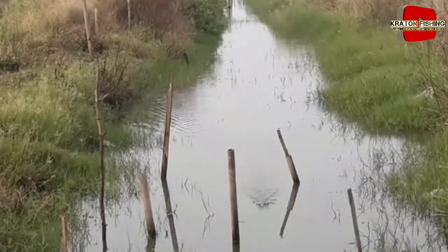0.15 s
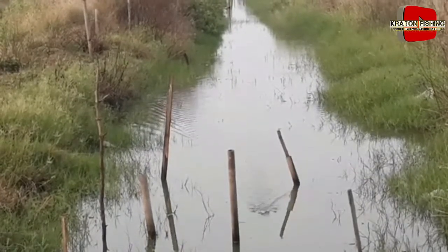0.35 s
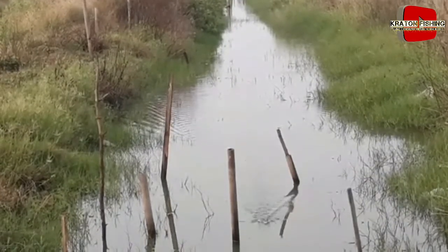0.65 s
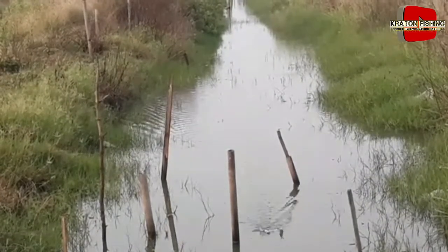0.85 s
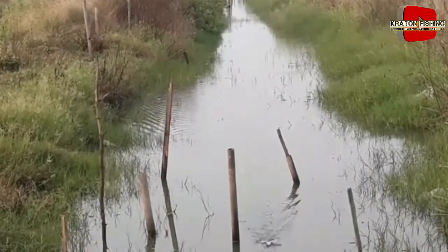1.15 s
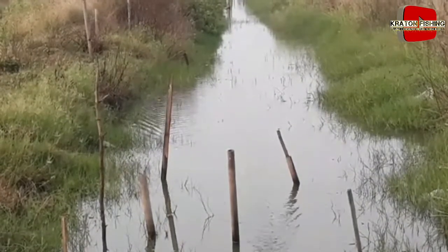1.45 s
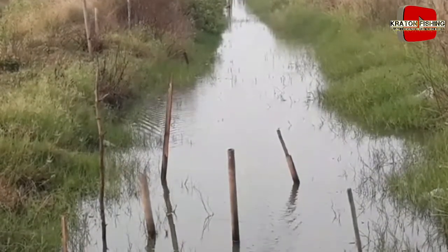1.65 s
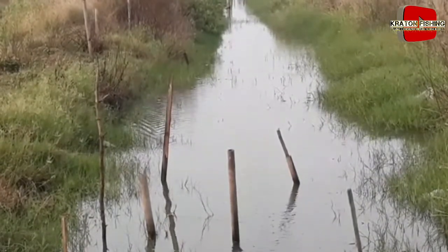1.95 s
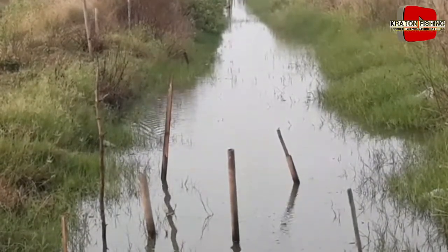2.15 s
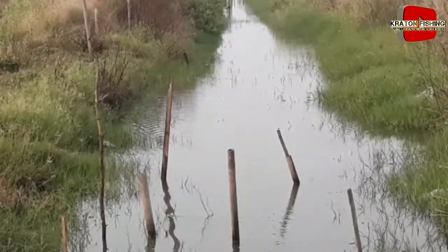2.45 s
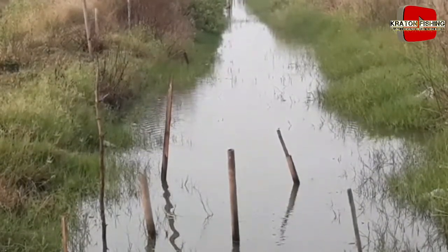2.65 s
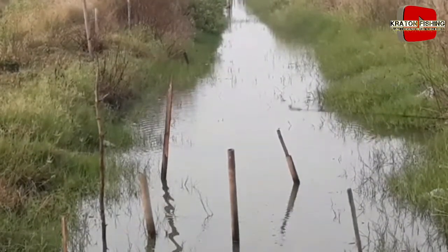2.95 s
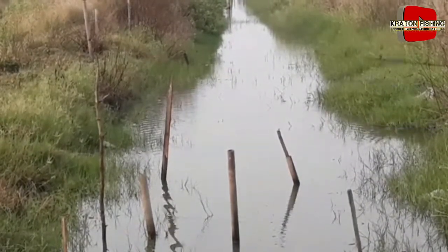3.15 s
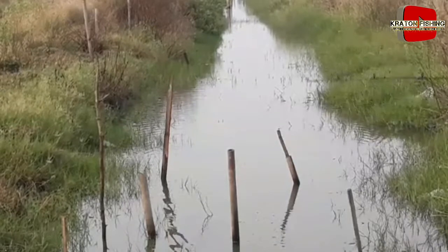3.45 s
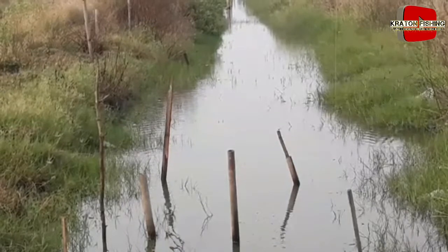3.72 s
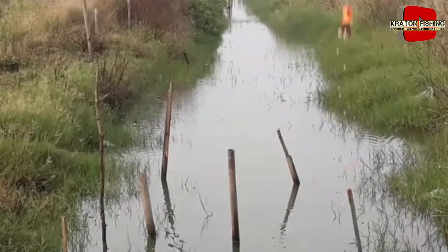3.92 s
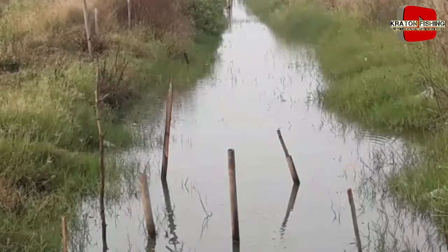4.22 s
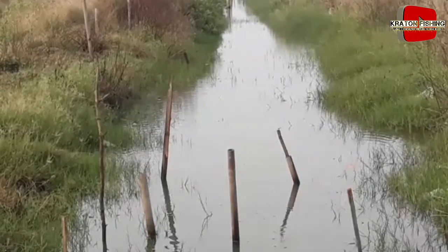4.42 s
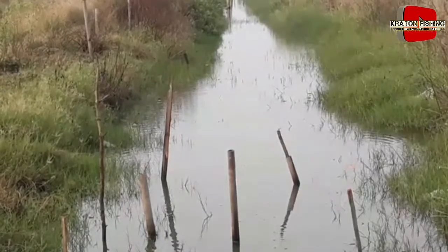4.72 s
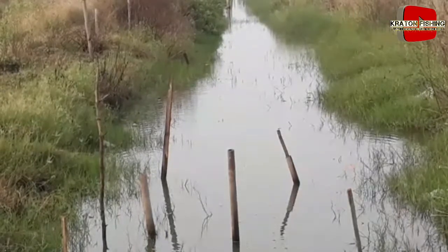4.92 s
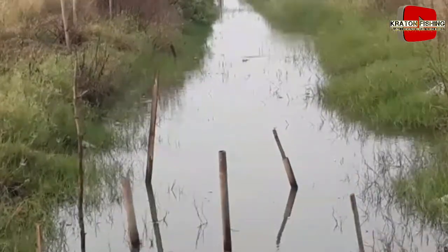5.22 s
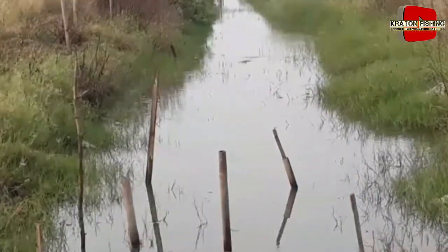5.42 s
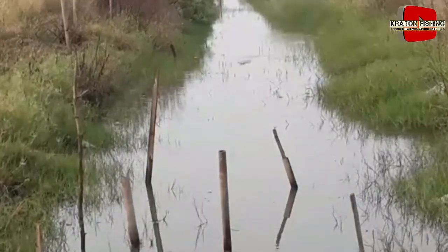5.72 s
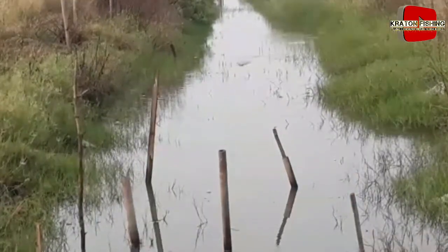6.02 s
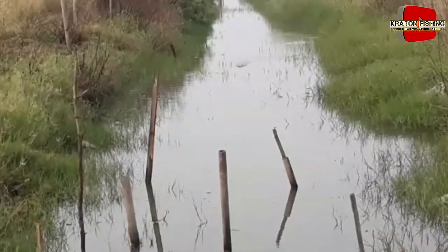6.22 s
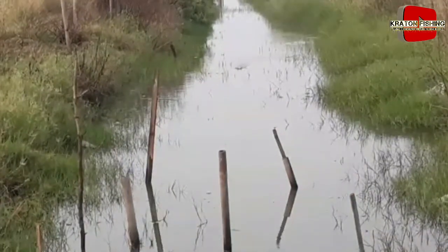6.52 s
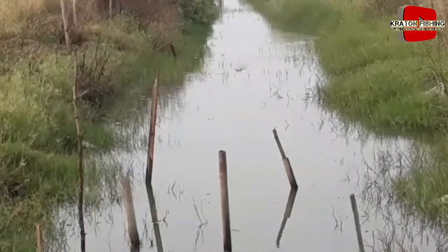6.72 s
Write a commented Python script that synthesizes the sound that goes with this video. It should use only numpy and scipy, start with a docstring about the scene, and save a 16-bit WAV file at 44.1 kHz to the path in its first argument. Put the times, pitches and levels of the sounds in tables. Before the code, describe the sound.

Close, loud, hollow plops of a lure on narrow canal water come singly and in quick pairs, mostly in the first five seconds, the loudest slightly overloading the microphone. Each leaves a brief fizz of droplets and a dull slap-back echo. A steady high insect drone, a low breeze, faint bird whistles and nasal calls, and tiny tackle clicks fill the open countryside.

```python
"""Hollow plops and slaps on water, close by, as an angler works a lure in a narrow canal.
Each plop is a shaped pulse with a ringing air pocket and a fizz of spray. It comes back off a hard face
some 13 m away and, faintly, from the far trees; the loudest overload the microphone.
Shaped noise makes the insects high in the grass and the light breeze, with low pulses for its buffets.
A few birds call in gliding tones, and tackle ticks in short bursts of ringing noise."""
import sys
import numpy as np
from scipy import signal
from scipy.fft import rfft, irfft
from scipy.io import wavfile
from scipy.ndimage import uniform_filter1d

SR = 44100
rng = np.random.default_rng(int(sys.argv[2]) if len(sys.argv) > 2 else 0)


def transcribe(u):
    """Save the signal u as a 16-bit wav file named by the first command-line argument.

    u: samples, shape (n,) or (channels, n), limited to [-1, 1]; the rate is SR.
    q: integer samples, one column per channel.
    """
    v = np.clip(np.atleast_2d(u).T, -1, 1)
    q = np.round(v * 32767).astype(np.int16)
    wavfile.write(sys.argv[1], SR, q)


N = 302967
TIME = np.arange(N) / SR

# every plop on the water: [t/s, relative strength/dB, bass change from heaved water/dB,
# treble change from the crack/dB, air pocket f/Hz, change of the far face's echo/dB]
PLOP_EVENTS = [(0.2139, -5.5, -5.5, -4.5, 700, 0), (0.5063, -8, 5.5, 2, 770, -2),
               (0.5098, -17.5, 2.5, 9.5, 1020, -3), (0.5199, -5, -8, -10, 720, -6.5),
               (1.2552, -13, -0.5, -5.5, 1000, 2.5), (1.4861, -11.5, -0.5, -3.5, 890, -0.5),
               (2.5105, -14, 0, -1.5, 620, 4.5), (2.5384, -13, 2, -4, 600, 4),
               (3.0755, -8, 6.5, -5, 1010, 4.5), (3.3756, -5, 6.5, 0.5, 566, -0.5),
               (4.1982, -6.5, -9.5, -8, 646, 2.5), (4.206, -13.5, 2, -3, 800, -14),
               (4.2780, -4, -10.5, -0.5, 804, 2), (4.7993, -6, -7, 1.3, 710, 1)]


def amp(db):
    """Turns decibels into a gain."""
    return 10 ** (np.asarray(db) / 20)


def evened(x):
    """Scales a sound to an average (rms) level of 1."""
    return x / np.sqrt(np.mean(x ** 2) + 1e-20)


def read(points, hz):
    """Joins (f/Hz, value) points with straight lines on a log-frequency axis."""
    f, value = np.transpose(points)
    return np.interp(np.log(hz + 1), np.log(f + 1), value)


def add(mix, s, sound):
    """Lays a sound into the mix at time s, in seconds."""
    part = mix[max(round(s * SR), 0):][:len(sound)]
    part += sound[:len(part)]


def causal(db, size=4096):
    """Makes the sharpest-starting (minimum-phase) pulse that has this spectrum."""
    log_gain = np.log(amp(np.maximum(db, -100)))
    circle = np.concatenate([log_gain, log_gain[-2:0:-1]])
    spectrum = np.exp(np.conj(signal.hilbert(circle)))
    return np.fft.ifft(spectrum).real[:size]


def noise(field, count, size):
    """Makes noise whose relative level in dB over time and frequency is field(t, hz)."""
    hop = size // 4
    t = np.arange(count // hop + 6)[:, None] * hop / SR
    hz = np.fft.rfftfreq(size, 1 / SR)
    shape = (len(t), len(hz))
    z = rng.standard_normal(shape) + 1j * rng.standard_normal(shape)
    shaped = (z * amp(field(t, hz))).T
    return signal.istft(shaped, nperseg=size, noverlap=size - hop)[1][:count]


def patches(t, hz, size):
    """Draws random ups and downs, smoothed over time and frequency, rms 1."""
    chance = rng.standard_normal((len(t), len(hz)))
    smooth_in_time = uniform_filter1d(chance, size, 0)
    return evened(uniform_filter1d(smooth_in_time, size, 1))


def lulls():
    """Gives the level change in dB over time of the insects and of the wash."""
    # one long lull of the insects alone, then a brief dip of both:
    # [middle t/s, time from middle to 1/e of the depth/s, insects level/dB, wash level/dB]
    lull_table = [(4.55, 0.99, -2, 0), (5.208, 0.1, -4, -7.5)]
    return sum(np.outer(depths_db, np.exp(-((TIME - s) / half) ** 2))
               for s, half, *depths_db in lull_table)


def air(lumps_db=2, patchy_db=1, rumble_hz=300):
    """A smooth distant wash over the lumpy rumble of the breeze, which slowly dies down."""
    # colour of breeze and wash: [f/Hz, relative level per Hz/dB]
    air_colour = [(18, -55), (35, -33), (55, -9), (90, -0.5), (160, -4.5), (320, -9), (400, -13.5),
                  (650, -16), (1200, -19.5), (3000, -31), (4500, -29.5), (5200, -38), (6500, -32.5),
                  (9000, -58)]
    level_db, settle_db_per_s = -38.5, 0.44

    def field(t, hz):
        """The colour, with unevenness that is strongest in the bass."""
        uneven_db = patchy_db + lumps_db / (1 + (hz / rumble_hz) ** 2)
        return read(air_colour, hz) + uneven_db * patches(t, hz, size=5)
    _, lull_db = lulls()
    return amp(level_db - settle_db_per_s * TIME + lull_db) * evened(noise(field, N, size=2048))


def insects(flutter_db=1.0, level_db=-41.5):
    """Many insects merge into a fluttering drone, strongest in one narrow band."""
    # colour of the chorus: [f/Hz, relative level per Hz/dB]
    chorus_colour = [(4000, -16.5), (6000, -22), (6700, -27), (6950, -12), (7200, 0), (7450, 2.5),
                     (7850, -3), (8020, -47), (8200, -22), (9400, -19.5), (10400, -41), (14000, -36),
                     (15300, -28.5), (16000, -43)]

    def field(t, hz):
        """The colour with random flutter."""
        return read(chorus_colour, hz) + flutter_db * patches(t, hz, size=5)
    lull_db, _ = lulls()
    return amp(level_db + lull_db) * evened(noise(field, N, size=512))


def scatter(count, late_t60=1.13, rise=0.00076):
    """Dense reflections, energy set band by band: a quick decay off the banks, a slow one off the land."""
    # scatter from banks and reeds: [f/Hz, early level/dB, early time to fall 60 dB/s, late level/dB]
    scatter_bands = [(89, 3, 0.067, -6), (297, -16, 0.18, -5), (800, -5, 0.17, -9.5),
                     (2160, -4.5, 0.44, -15)]
    t, hz = np.arange(count) / SR, np.fft.rfftfreq(count, 1 / SR)
    white = rfft(rng.standard_normal(count))
    centres = np.transpose(scatter_bands)[0]
    out = np.zeros(count)
    # each share row fades one band into its neighbours
    for share, (_, early_db, t60, late_db) in zip(np.eye(len(scatter_bands)), scatter_bands):
        band = irfft(white * read(np.c_[centres, share], hz), count)
        early, late = (evened(np.exp(-np.log(1000) * t / d) * (1 - np.exp(-t / rise)))
                       for d in (t60, late_t60))
        out += band * np.hypot(amp(early_db) * early, amp(late_db) * late)
    return out / np.sqrt(count)


def glide(length, first_hz, last_hz, waver):
    """Phase of a slightly unsteady bird note, and its soft-edged envelope."""
    count = round(length * SR)
    unsteady = 1 + waver * evened(uniform_filter1d(rng.standard_normal(count), size=200))
    pitch_hz = np.linspace(first_hz, last_hz, count) * unsteady
    return 2 * np.pi * np.cumsum(pitch_hz) / SR, signal.windows.tukey(count, .5)


def birds(wet_db=-12, sag_hz_per_s=3000):
    """Pure falling whistles and nasal calls rich in harmonics, some way off."""
    # whistles: [t/s, length/s, first f/Hz, level/dB]
    whistles = [(.15, .065, 2200, -44), (1.776, .025, 2290, -41), (2.01, 0.014, 4200, -42),
                (5.422, 0.13, 4770, -44), (6.099, 0.18, 4850, -40.5)]
    # nasal calls: [t/s, length/s, first f/Hz, last f/Hz, level/dB, brightness per harmonic/dB]
    squawks = [(0.124, .048, 810, 770, -48, -1), (1.778, 0.076, 620, 663, -42, .5),
               (1.912, .09, 632, 660, -49.5, -9), (6.692, 0.14, 753, 722, -53, -1)]
    # colour given by the beak: [f/Hz, relative level/dB]
    beak_colour = [(700, -26), (1300, -8), (1950, 5.5), (2600, 0), (3300, -1), (4500, -7.5), (6000, -13),
                   (9000, -31)]
    out = np.zeros(N)
    for s, length, first_hz, db in whistles:
        phase, envelope = glide(length, first_hz, first_hz - sag_hz_per_s * length, waver=0.01)
        add(out, s, amp(db) * envelope * np.sin(phase))
    for s, length, first_hz, last_hz, db, bright_db in squawks:
        phase, envelope = glide(length, first_hz, last_hz, waver=0.017)
        voice = sum(amp(read(beak_colour, k * first_hz) + k * bright_db) * np.cos(k * phase)
                    for k in range(1, 12))
        add(out, s, amp(db) * envelope * evened(voice))
    return out + amp(wet_db) * signal.fftconvolve(out, scatter(count=32768))[:N]


def taps(rows, count, jitter):
    """Single reflections; their delays differ a little (jitter, in s) from one plop to the next."""
    out = np.zeros(count)
    for delay, db in rows:
        shifted = delay + jitter * rng.standard_normal()
        out[abs(round(shifted * SR))] += amp(db)
    return out


def cluster(count, delay, spread):
    """A blurred echo of energy 1, centred on delay; both times in s."""
    t = np.arange(count) / SR
    blur = np.exp(-((t - delay) / spread) ** 2)
    return evened(rng.standard_normal(count) * blur) / np.sqrt(count)


def canal(echo_db, count=32768, dull_hz=1500, blur_db=-15, trees_db=-22, rough_db=0):
    """The paths from one plop to the microphone; the far echoes have lost their treble."""
    # single reflections off the near banks: [delay t/s, level/dB]
    near_rows = [(.00305, -9.5), (.0062, -15), (.018, -20)]
    # single reflections off the hard face: [delay t/s, relative level/dB]
    face_rows = [(.0525, -16), (.066, -23.5), (.0733, -5.5), (.0853, -13)]
    face = taps(face_rows, count, jitter=0.00014)
    # the face is uneven, so part of each reflection arrives smeared over a few milliseconds
    smeared = signal.fftconvolve(face, cluster(count=512, delay=0.0017, spread=0.0032))[:count]
    face = (face + amp(rough_db) * smeared) / np.hypot(1, amp(rough_db))
    far = amp(echo_db) * (face + amp(blur_db) * cluster(count, delay=0.092, spread=0.024))
    far += amp(trees_db) * cluster(count, delay=0.31, spread=0.028)
    dull_far = signal.sosfilt(signal.butter(2, dull_hz, fs=SR, output="sos"), far)
    paths = taps(near_rows, count, jitter=.00005) + scatter(count) + dull_far
    paths[0] += 1  # the direct sound
    return paths


def plops(gain_db=25, heave_hz=420, crack_hz=1500, pocket_width_hz=230, pocket_db=1.5):
    """A slap pushes the water (bass), cracks its surface (treble) and traps air that rings briefly."""
    # colour shared by all plops: [f/Hz, relative level/dB]
    plop_colour = [(35, -16), (82, 9), (180, 0), (295, 8.5), (440, 3.5), (540, 13), (650, 12), (800, 9.5),
                   (1020, 9), (1330, 1), (1520, -9.5), (2600, -10.5), (5000, -30), (10000, -57)]
    out, hz = np.zeros(N), np.fft.rfftfreq(8192, 1 / SR)
    low = 1 / (1 + (hz / heave_hz) ** 6)
    high = 1 - 1 / (1 + (hz / crack_hz) ** 6)
    for s, db, heave_db, crack_db, pocket_hz, echo_db in PLOP_EVENTS:
        pocket = 1 / (1 + ((hz - pocket_hz) / pocket_width_hz) ** 2)
        colour_db = read(plop_colour, hz) + heave_db * low + crack_db * high + pocket_db * pocket
        pulse = causal(colour_db)
        add(out, s, amp(db + gain_db) * signal.fftconvolve(pulse, canal(echo_db)))
    return out


def spray(t60=0.66, rise=0.002, grain_db=4):
    """Fine droplets fizz after each plop and thin out; harder, heavier plops throw more of them."""
    # colour of the droplets: [f/Hz, relative level per Hz/dB]
    spray_colour = [(500, -14), (1500, 3), (2700, -4), (4200, -10), (5600, -25), (10000, -53)]
    base_db, db_per_strength_db, db_per_heave_db = -30, .5, 0.33
    out, t = np.zeros(N), np.arange(16384) / SR
    colour = causal(read(spray_colour, np.fft.rfftfreq(8192, 1 / SR)))
    envelope = (1 - np.exp(-t / rise)) * np.exp(-np.log(1000) * t / t60)
    for s, db, heave_db, *_ in PLOP_EVENTS:
        spray_db = base_db + db_per_strength_db * db + db_per_heave_db * heave_db
        # random boosts, at most five times grain_db, make the noise grainy
        grain = amp(grain_db * np.minimum(rng.exponential(1, len(t)), 5))
        drops = rng.standard_normal(len(t)) * grain
        fizz = evened(signal.fftconvolve(drops, colour)[:len(t)])
        add(out, s, amp(spray_db) * envelope * fizz)
    return out


def ticks(width_hz=2500):
    """Tiny knocks and scrapes of tackle, each a burst of noise in one broad resonance."""
    # the clearest ones: [t/s, approximate peak level/dB, f/Hz, decay to 1/e/s]
    clear_ticks = [(0.666, -34, 4900, .004), (2.127, -40, 6000, .002), (3.525, -43, 9000, .003),
                   (3.703, -25, 6700, 0.0035), (5.337, -48, 5500, .015), (5.729, -42, 5500, 0.014)]
    out, t = np.zeros(N), np.arange(2048) / SR
    for s, db, hz, decay in [*clear_ticks, *fiddling()]:
        ring = signal.lfilter(*signal.iirpeak(hz, hz / width_hz, SR), rng.standard_normal(len(t)))
        # halving the rms puts the noise peaks nearer the listed level
        add(out, s, amp(db) * evened(ring) * np.exp(-t / decay) / 2)
    return out


def fiddling(count=11, decay_s=0.0084, spread_db=1):
    """Faint ticks strewn unevenly over each spell of handling the tackle."""
    # spells of rustling: [from t/s, to t/s, approximate peak level/dB, f/Hz]
    spells = [(3.298, 3.822, -50.5, 10400), (5.7, 6.098, -45, 4400)]
    rustles = []
    for start, stop, db, hz in spells:
        for k in range(count):
            s = start + (stop - start) * (k + rng.random()) / count
            rustles.append((s, db + spread_db * rng.uniform(-1, 1), hz, decay_s))
    return rustles


def buffets(length=0.0354):
    """Soft buffets of the breeze: a few cycles of low pressure waves at the microphone."""
    # [middle t/s, peak level/dB, f/Hz]
    buffet_table = [(0.788, -33, 148), (1.78, -38, 100), (3.632, -32, 239), (3.745, -28.5, 112),
                    (3.8, -25.5, 99), (5.322, -29, 137), (5.708, -32, 135)]
    out, t = np.zeros(N), np.arange(0, length, 1 / SR)
    for s, db, hz in buffet_table:
        wave = np.sin(2 * np.pi * (hz * t + rng.random()))
        add(out, s - length / 2, amp(db) * np.hanning(len(t)) * wave)
    return out


def scene():
    """Everything at one microphone."""
    return (plops() + spray() + air() + buffets() + insects() + birds() + ticks())[None]


def record(dry, edge_hz=15650):
    """The loudest plops clip; then a filter removes the highest treble."""
    clipped = np.clip(dry, -1, 1)
    lowpass = signal.firwin(511, edge_hz, window=("kaiser", 9), fs=SR)
    return signal.oaconvolve(clipped, lowpass[None], "same")


dry = scene()
out = record(dry)
transcribe(out)
```